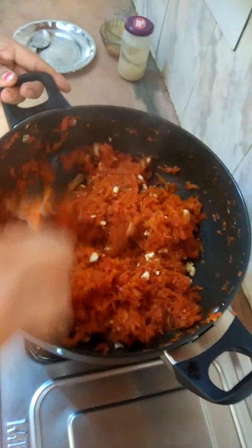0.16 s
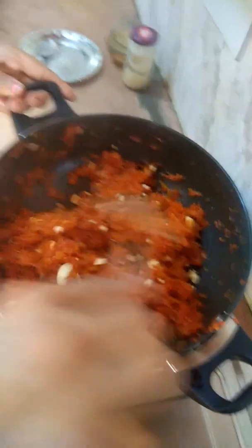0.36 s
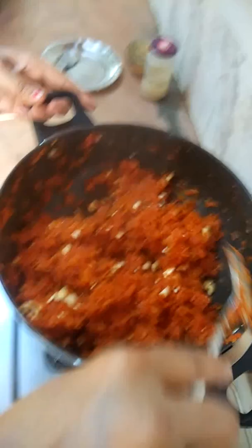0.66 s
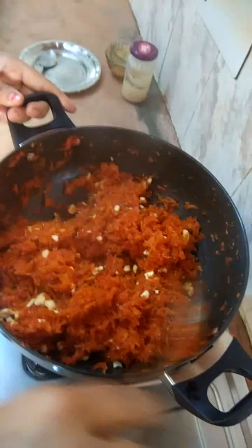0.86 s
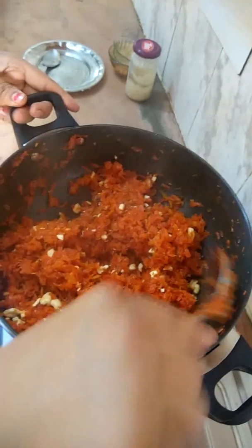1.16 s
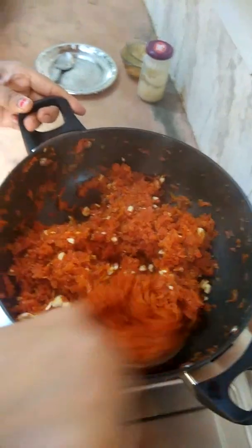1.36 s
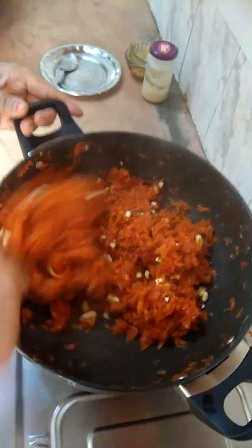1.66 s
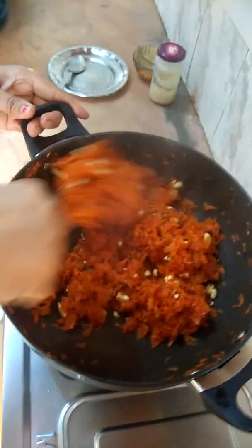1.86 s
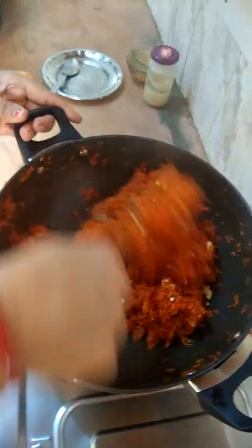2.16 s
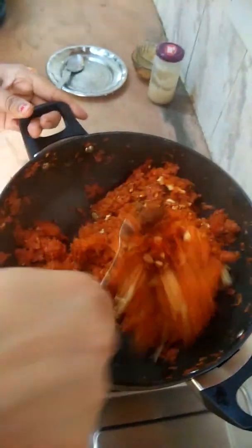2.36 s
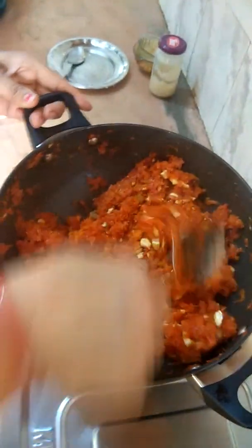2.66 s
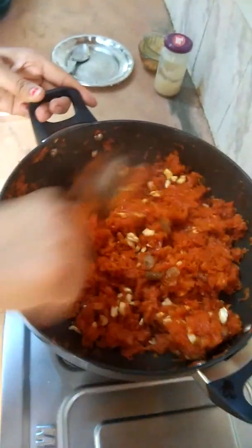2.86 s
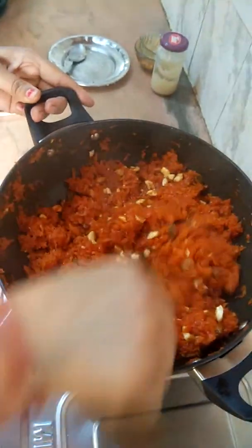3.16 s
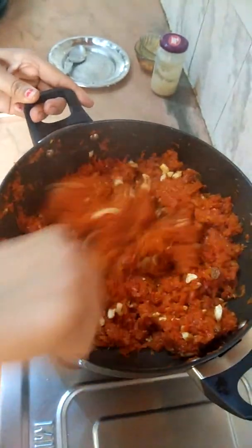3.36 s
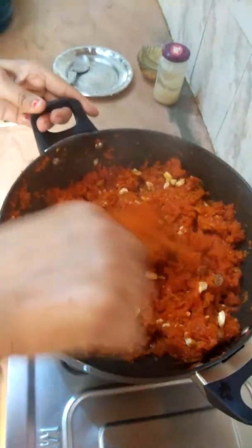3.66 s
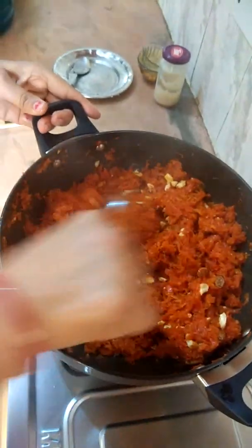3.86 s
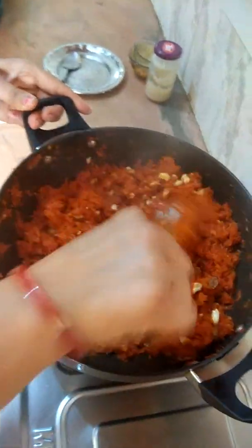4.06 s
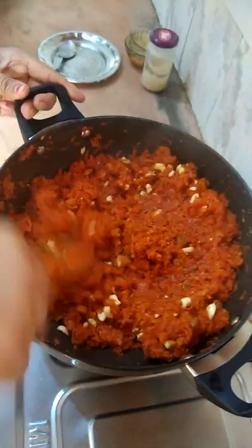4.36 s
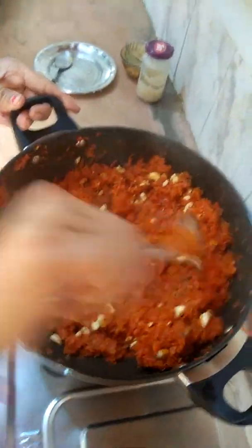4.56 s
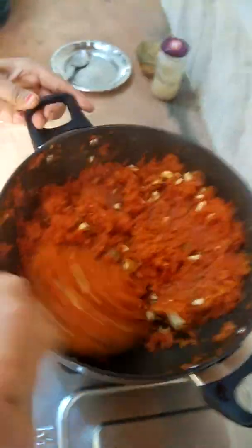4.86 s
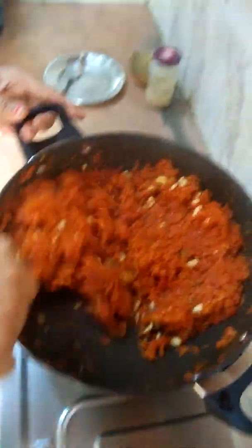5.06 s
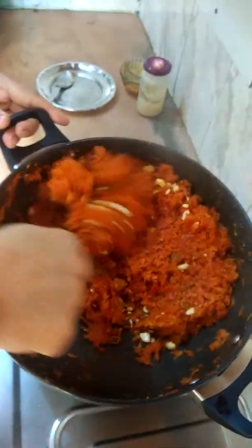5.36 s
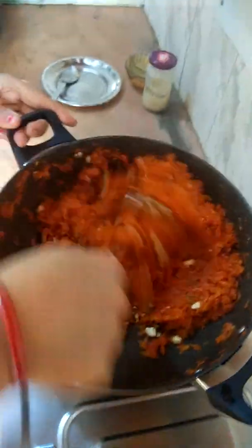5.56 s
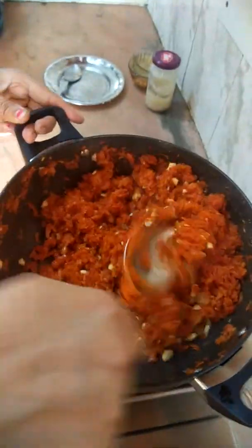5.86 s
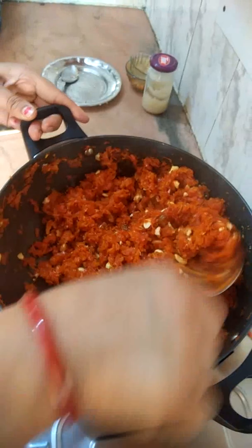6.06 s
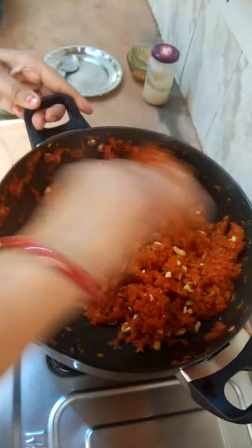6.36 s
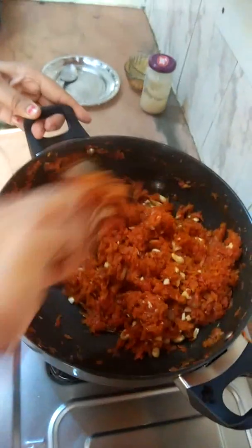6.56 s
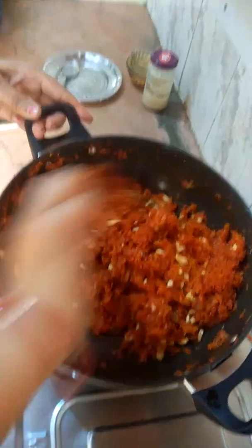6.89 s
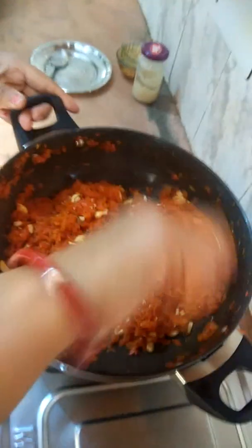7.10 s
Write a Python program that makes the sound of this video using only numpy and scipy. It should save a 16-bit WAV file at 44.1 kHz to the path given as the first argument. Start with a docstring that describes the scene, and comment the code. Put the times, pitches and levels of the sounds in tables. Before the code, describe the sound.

Someone stirs thick food in a metal pan with a spoon. Quick gritty scrapes and skidding knocks come in uneven clusters, their ring short and damped by the food. Quiet steady hiss with tiny pops and a wavering low rumble continue underneath, with occasional faint narrow squeaks. The microphone is near the pan in a small, hard-walled home kitchen, with wide crisp treble.

```python
"""A bright scrape comes first: a steel spoon strokes the bare wall of a deep metal pan in a small hard kitchen.
Strokes are dense friction clicks, knocks are skidding bursts of clicks; both sound through the pan's ring,
which the thick food damps to a short dense noise tail with a few clear modes.
Under them lie a faint sizzle of hiss and pops, and a rumble of noise booming in the lowest room resonances.
Now and then a soft narrow squeak glides by, as of the pan shifting on its stand."""
import sys
import numpy as np
from scipy import signal
from scipy.fft import rfft, irfft
from scipy.io import wavfile

SR = 44100
rng = np.random.default_rng(int(sys.argv[2]) if len(sys.argv) > 2 else 0)


def transcribe(signal):
    """Save signal, clipped to [-1, 1], as a 16-bit WAV file at the path in sys.argv[1]."""
    frames = np.atleast_2d(signal).T
    limited = np.clip(frames, -1, 1)
    pcm = np.round(limited * 32767).astype(np.int16)
    wavfile.write(sys.argv[1], SR, pcm)


N = 318843

# spoon strokes; each pair of levels slides evenly from first to last touch:
# (start t/s, length t/s, rim hiss level/dB first, last, then re that hiss: lip level/dB first, last,
#  shoulder level/dB first, last, wall level/dB first, last, belly level/dB first, last)
SPOON_STROKES = [(-.03, 0.067, -4, -33.5, -1, -8, -28, -30, -29, -28, -20, -39),
                 (0.03, 0.14, -15, -22.5, -6.5, -1.5, -33, -27, -40, -20, -50.5, -10),
                 (0.869, 0.049, -47, -31, -21, -15, -16, -23, -4, -8.5, 7, -14.5),
                 (1.336, 0.03, -4.5, -24.5, -4.5, -4, -21, -10, -13.5, -19.5, -6.5, -18),
                 (1.403, 0.087, -18.5, -21.5, -9.5, -6.5, -35, -27, -41, -17.5, -35, -31),
                 (1.484, 0.072, -21.5, -21.5, -0.5, -4.5, -13, -10, -8, -6, -19, -18),
                 (1.593, 0.059, -27.5, -20, -8, -5, -12, -22, -11, -17, -38, -32),
                 (1.638, 0.028, -4, -17, -2.5, -7, -35, -23, -17.5, -6.5, -26.5, -11),
                 (1.727, 0.12, -35.5, -38.5, -19, -0.5, -33, -28, -40, 3, -36, -26),
                 (1.915, 0.13, -51, -41.5, -5, 0.5, -6, -13, -4, -7, -9, -12),
                 (3.337, 0.21, -60, -51.5, -7, -3, -10, -6, -2, 0.5, 8, -16),
                 (3.958, 0.24, -66, -65, -3, 0, 0, 0, 9.5, 13.5, 3, -3),
                 (4.804, 0.15, -16.5, -21.5, -18, -4.5, -24.5, -9, -33.5, -14.5, -21.5, -26.5),
                 (4.957, 0.11, -21.5, -27.5, -4, -2.5, -13, -16.5, -26, -14, -43, -32),
                 (5.142, 0.32, -42.5, -57.5, -8, -2, -9, -13, -22, 4.5, -12, -13),
                 (6.389, 0.16, -23.5, -26, -10, -7.5, -25, -19.5, -17.5, -20, -36.5, -20),
                 (6.891, 0.057, -35, -39, -21, -15, -11, -22, -14, -8, -20, -11),
                 (6.936, 0.11, -28.5, -23.5, -23, -20, -30, -28, -40, -24, -33, -34.5),
                 (7.032, 0.18, -22.5, -19.5, -11, -7.5, -45, -22, -38, -18, -43, -28.5)]
STROKE_ATTACK_S, STROKE_RELEASE_S = 0.017, 0.013   # the edge settles on the metal and lifts off
WANDER_PER_S = 22   # how fast a stroke moves between places
GRIT_DB = -7   # sharp lone clicks in a stroke, re its ring

# spoon knocks: (t/s, belly level/dB before the common knock trim, then re belly: wall level/dB,
#  shoulder level/dB, rim level/dB; loudest mode f/Hz, skid t/s, crack level/dB re usual)
SPOON_KNOCKS = [(0.351, -44, -2.5, -8, -22, 925, 0.01, 0), (0.841, -35, -5, -19, -3, 780, 0.023, 19),
                (1.285, -26.5, -8.5, -18, 5, 655, 0.0099, 15.5),
                (1.682, -43.5, 4, 12.5, 3, 1480, 0.0032, 9), (1.846, -26, 0.5, -4, -1, 475, .009, 11),
                (2.87, -20.5, 3.5, 2, 7.5, 1120, 0.0062, 12.5),
                (3.055, -38.5, -2, -20, -44.5, 536, 0.023, -1), (4.12, -42, -5.5, -25, -26, 557, 0.014, -5),
                (4.284, -29.5, -4, -11, -16, 1410, 0.013, -7),
                (4.308, -38.5, -5, -18, -25, 585, 0.0042, -9), (5.63, -15, -2.5, -6, -8, 1890, 0.014, 12.5),
                (6.459, -49.5, -11, 7, 23, 583, 0.004, 8), (6.776, -35, 2.5, -6.5, 2.5, 484, 0.0092, 9),
                (6.802, -38, -8, -15, -7, 604, 0.0041, -5), (6.884, -44.5, 6.5, -1, 11, 2310, 0.01, 6)]
KNOCK_TRIM_DB = -7.5   # on the clicks of every knock
KNOCK_LIP_DB = -3   # lip zone of a knock, re its rim zone
SKID_CLICKS = 16
NEAR_MODE_DB, NEAR_MODE_REACH_OCT = 12, 0.14   # a knock favours the modes near its pitch

# zones of the pan, in order belly, wall, shoulder, lip, rim: (lowest f/Hz, highest f/Hz)
PAN_ZONES = [(250, 1400), (1400, 3500), (3500, 5100), (5100, 7800), (7800, 17500)]
# spectrum of the dense ring, relative within a zone: (f/Hz, level/dB per Hz)
PAN_COLOUR_CURVE = [(220, -17.5), (1420, -16.5), (1900, -11.5), (2600, -13.5), (3300, -12.5), (3740, -21.5),
                    (4400, -11), (5000, -18.5), (5300, 1.5), (7500, 0), (9180, 2), (12700, 0.5),
                    (14500, -4), (16000, -9)]
# how unlike the places on the wall sound, in narrow bands: (f/Hz, spread level/dB)
PLACE_SPREAD = [(1000, 6), (6000, 6.5)]
# modes that stand out of the dense ring: (f/Hz, level/dB, t60 t/s)
CLEAR_MODES = [(445, -6.5, 0.054), (588, -15.5, 0.25), (709.6, -4, 0.081), (1098, -4.5, 0.067),
               (1494, -6.5, 0.073), (2020, -6, 0.052), (2207, -0.5, 0.034), (2865, -2, 0.038),
               (4150, -2, .05), (6630, -2, 0.099), (8740, -6.5, 0.074)]
# fall of the dense ring and room by 60 dB: one t/s for each zone
ZONE_T60 = [0.22, 0.2, 0.17, 0.23, 0.26]
# direct sound of the contact: one level/dB for each zone
CRACK_LEVELS = [-5, 0, -3, -2, 3]
CRACK_T60_S = 0.0085
RING_RISE_S = 0.0033   # the dense ring takes a moment to build up
PLACES = 7   # on the wall, each with a colour of its own

# hiss of the sizzle before its pops: (t/s, level/dB)
SIZZLE_LEVEL = [(0, -49), (2.2, -46.5), (7.23, -48)]
# relative spectrum of that hiss: (f/Hz, level/dB per Hz)
SIZZLE_SPECTRUM = [(15, -54), (25, -12.5), (59, -18.5), (102, -5.5), (185, -5), (217, -50), (394, -35),
                   (503, -24.5), (714, -18.5), (2220, -15.5), (7110, -18.5), (9840, -16), (16000, -17.5)]

# slow rumble under the booms: (t/s, level/dB at the lowest room resonance, second, third)
SLOW_RUMBLE = [(0, -72, -55.5, -66), (.66, -48.5, -64.5, -74), (1.1, -49, -70, -55.5), (1.5, -36, -36, -49),
               (1.75, -53.5, -46, -46), (2.05, -37.5, -37.5, -43.5), (2.44, -74, -39.5, -60.5),
               (2.7, -52, -59, -70), (3.4, -56, -61.5, -69.5), (3.9, -67, -104, -71.5),
               (4.2, -78, -52, -52.5), (4.5, -55, -59.5, -69.5), (5.3, -52, -52, -69),
               (6.15, -48.5, -57, -60), (7.23, -66, -73, -90)]
# short soft booms, at their peak: (middle t/s, length t/s, level/dB at the lowest resonance, second)
RUMBLE_BOOMS = [(0.918, 0.1, -38.5, -49), (1.032, 0.11, -37, -54), (1.118, 0.064, -27, -69),
                (1.173, 0.049, -22.5, -68), (1.268, 0.27, -36, -55), (1.364, 0.054, -23.5, -57),
                (1.422, 0.059, -27.5, -40), (1.586, 0.085, -33, -43), (1.912, 0.13, -44.5, -30.5),
                (2.14, 0.11, -66, -35), (2.294, 0.18, -47, -33), (2.56, 0.21, -27, -74),
                (5.465, 0.14, -40.5, -81), (5.694, 0.16, -49, -35.5)]
BOOM_THIRD_DB = -18.5   # a boom at the third resonance, re the second
# lowest resonances of the room, before a second and broader pass: (f/Hz, width f/Hz)
ROOM_RESONANCES = [(99, 12.6), (176, 13.6), (315, 47)]
WHIRR_HZ, WHIRR_WIDTH_HZ, WHIRR_DB = 711, 103, -66.5   # a faint steady narrow hum; width of each pass

# soft narrow squeaks, before roughening: (start t/s, end t/s, start f/Hz, end f/Hz, level/dB)
PAN_SQUEAKS = [(3.48, 3.578, 1003, 1240, -56), (3.85, 4.138, 726, 790, -56), (4.04, 4.24, 333, 300, -50),
               (6.3, 6.392, 870, 863, -53.5), (6.66, 6.8, 354, 370, -53.5)]

# how alike the left and right ports are: (f/Hz, likeness from 0 to 1)
PORT_LIKENESS = [(90, 0.92), (200, 0.99), (400, 0.45), (1400, 0.079)]
TREBLE_HZ, TREBLE_LEFT_DB, LEFT_DB = 11640, 9.5, -0.5   # left re right: treble, and level throughout
CUTOFF_HZ = 15750


def from_db(db):
    """Gain of a level."""
    return 10 ** (np.asarray(db) / 20)


def rms_one(x):
    """Scaled to rms 1."""
    return x / np.sqrt(np.mean(x ** 2) + 1e-20)


def in_time(rows):
    """Columns of a curve at every sample."""
    s, *columns = np.transpose(rows)
    return np.array([np.interp(np.arange(N) / SR, s, c) for c in columns])


def at_hz(points, hz):
    """A spectrum read on a log-frequency axis."""
    point_hz, values = np.transpose(points)
    return np.interp(np.log(hz + 1), np.log(point_hz), values)


def drift(per_s, count):
    """Random curves, straight between normal draws of spread 1 taken per_s times a second."""
    knots = rng.standard_normal((count, int(N / SR * per_s) + 2))
    position = np.arange(N) / SR * per_s
    return np.array([np.interp(position, np.arange(len(k)), k) for k in knots])


def stereo_noise(colour, size):
    """Coloured noise, alike in both ports in the bass and mostly unrelated in the treble; rms 1."""
    hz = np.fft.rfftfreq(size, 1 / SR)
    mid, side = rfft(rng.standard_normal((2, size))) * from_db(at_hz(colour, hz))
    alike = at_hz(PORT_LIKENESS, hz)
    ports = np.sqrt(1 + alike) * mid + np.sqrt(1 - alike) * side * [[1], [-1]]
    return rms_one(irfft(ports, size))


def grains(per_s, spread_db, shape):
    """Random clicks with a tail of sizes, towards loud or (negative spread) soft; rms 1."""
    sizes = from_db(spread_db * np.minimum(rng.exponential(1, shape), 5))
    signed = sizes * rng.choice([-1, 1], shape)
    return rms_one(signed * (rng.random(shape) < per_s / SR))


def through(force, answer):
    """A steady force sounds through an answer at its own level."""
    energy = np.mean(np.sum(answer ** 2, axis=1))
    return signal.oaconvolve(force[None], answer / np.sqrt(energy), axes=1)[:, :N]


def pan_ring(zone):
    """Click answer of one zone at one place, both ports: dying dense ring with clear modes, and crack."""
    size = SR // 2
    t = np.arange(size) / SR
    low_hz, high_hz = PAN_ZONES[zone]
    band = signal.butter(8, (low_hz, high_hz), "band", fs=SR, output="sos")
    # random bumps and dips give the place its own colour
    hz = np.linspace(130, 17000, num=421)
    knots_hz = hz[::6]
    patches = np.interp(hz, knots_hz, rng.standard_normal(len(knots_hz)))
    colour_db = at_hz(PAN_COLOUR_CURVE, hz) + patches * at_hz(PLACE_SPREAD, hz)
    dense = rms_one(signal.sosfilt(band, stereo_noise(np.transpose([hz, colour_db]), size)))
    ring = dense * from_db(-60 * t / ZONE_T60[zone]) * (1 - np.exp(-t / RING_RISE_S))
    for mode_hz, level_db, t60 in CLEAR_MODES:
        if low_hz < mode_hz < high_hz:
            phase = (1 - at_hz(PORT_LIKENESS, mode_hz)) * rng.uniform(-np.pi, np.pi, (2, 1))
            ring += from_db(level_db - 60 * t / t60) * np.sin(2 * np.pi * mode_hz * t + phase)
    crack = dense * from_db(CRACK_LEVELS[zone] - 60 * t / CRACK_T60_S)
    return ring, crack


def stroke_level():
    """How hard the spoon edge drives each zone, under an uneven hand."""
    level, t = np.zeros((len(PAN_ZONES), N)), np.arange(N) / SR
    for start_s, length_s, *ends_db in SPOON_STROKES:
        along = np.clip((t - start_s) / length_s, 0, 1)
        hiss_db, *zones_db = [a + (b - a) * along for a, b in np.reshape(ends_db, (-1, 2))]
        settle = (t - start_s) / STROKE_ATTACK_S
        lift = (start_s + length_s - t) / STROKE_RELEASE_S + 1
        touching = np.clip(np.minimum(settle, lift), 0, 1)
        belly_to_rim_db = np.array(zones_db[::-1] + [0 * hiss_db])
        level += touching * from_db(hiss_db + belly_to_rim_db)
    return level * from_db(1.8 * drift(per_s=38, count=len(PAN_ZONES)))


def strokes(rings):
    """Fine friction clicks wander over the places and ring; lone grit clicks only crack."""
    out, level = np.zeros((2, N)), stroke_level()
    share = from_db(38.0 * drift(WANDER_PER_S, count=PLACES))
    share /= np.sqrt(np.sum(share ** 2, axis=0))   # total power stays the same
    friction = share * grains(per_s=9000, spread_db=2.5, shape=(PLACES, N))
    grit = from_db(GRIT_DB) * grains(per_s=1300, spread_db=2.5, shape=N)
    for place, force in zip(rings, friction):
        for (ring, crack), zone_level in zip(place, level):
            out += through(force * zone_level, ring)
    for (ring, crack), zone_level in zip(rings[0], level):
        out += through(grit * zone_level, crack)
    return out


def knocks(rings):
    """A knock is a first click and a short skid of ever weaker clicks over neighbouring places."""
    out = np.zeros((2, N + SR))
    for k, (s, belly_db, wall_db, shoulder_db, rim_db, _, skid_s, crack_db) in enumerate(SPOON_KNOCKS):
        re_belly_db = np.array([0, wall_db, shoulder_db, rim_db + KNOCK_LIP_DB, rim_db])
        zones = from_db(belly_db + KNOCK_TRIM_DB + re_belly_db)
        answers = [sum(gain * (ring + from_db(crack_db) * crack)
                       for gain, (ring, crack) in zip(zones, place)) for place in rings]
        lateness = np.sort(rng.random(SKID_CLICKS))   # as a share of the skid
        lateness[0] = 0
        signs = rng.choice([-1, 1], SKID_CLICKS)
        for i, late in enumerate(lateness):
            click_gain = signs[i] * from_db(-2.5 * (i > 0) - 8.4 * late)
            start = round((s + skid_s * late) * SR)
            out[:, start:start + SR // 2] += click_gain * answers[(k + i) % PLACES]
    return out[:, :N]


def knock_tones():
    """Each knock rings extra in the modes nearest to its pitch, as dying sines alike in both ports."""
    out, t = np.zeros(N + SR), np.arange(SR // 2) / SR
    for s, belly_db, wall_db, _, _, pitch_hz, _, _ in SPOON_KNOCKS:
        start = round(s * SR)
        for hz, level_db, t60 in CLEAR_MODES:
            near = np.exp(-(np.log2(hz / pitch_hz) / NEAR_MODE_REACH_OCT) ** 2)
            above_belly = hz > PAN_ZONES[0][1]
            size_db = belly_db + wall_db * above_belly + level_db + NEAR_MODE_DB
            tone = from_db(size_db - 60 * t / t60) * np.sin(2 * np.pi * hz * t)
            out[start:start + len(t)] += near * tone
    return out[:N]


def pan():
    """Strokes and knocks excite the same pan, so they share its rings."""
    rings = [[pan_ring(zone) for zone in range(len(PAN_ZONES))] for place in range(PLACES)]
    return strokes(rings) + knocks(rings) + knock_tones()


def sizzle():
    """Smooth kitchen hiss, roughened by tiny pops of the frying food."""
    clicks = np.abs(grains(per_s=460, spread_db=-2.0, shape=N))
    pops = signal.lfilter([.02], [1, -.98], clicks)   # each pop dies away softly
    hiss = from_db(in_time(SIZZLE_LEVEL)) * stereo_noise(SIZZLE_SPECTRUM, N)
    return hiss * (1 + 0.13 * rms_one(pops))


def resonance(x, hz, width_hz):
    """Two-pole resonance, silent at zero and at half the sample rate."""
    r = np.exp(-np.pi * width_hz / SR)
    return signal.lfilter([1, 0, -1], [1, -2 * r * np.cos(2 * np.pi * hz / SR), r * r], x)


def rumble_gains():
    """Gain at each room resonance: the slow rumble with a smooth swell for every boom."""
    gains, t = from_db(in_time(SLOW_RUMBLE)), np.arange(N) / SR
    for s, length_s, low_db, second_db in RUMBLE_BOOMS:
        swell = np.cos(np.pi * np.clip((t - s) / length_s, -.5, .5)) ** 2
        gains += swell * from_db([[low_db], [second_db], [second_db + BOOM_THIRD_DB]])
    return gains


def rumble():
    """Low noise that only the room resonances carry, and a faint narrow whirr."""
    out = np.zeros((2, N))
    noise = stereo_noise([(20, 0), (2000, 0)], N)   # flat spectrum
    for gain, (hz, width_hz) in zip(rumble_gains(), ROOM_RESONANCES):
        boom = rms_one(resonance(resonance(noise, hz, width_hz), hz, 3 * width_hz))
        envelope = np.abs(signal.hilbert(boom[0] + boom[1])) / 2
        steadied = boom / (0.94 + envelope) ** 0.25   # eases the wavering of the level
        out += gain * rms_one(steadied)
    whirr = resonance(resonance(noise, WHIRR_HZ, WHIRR_WIDTH_HZ), WHIRR_HZ, WHIRR_WIDTH_HZ)
    return out + from_db(WHIRR_DB) * rms_one(whirr)


def squeaks():
    """Gliding tones roughened to a narrow band of noise, unlike at the two ports."""
    out = np.zeros((2, N))
    slow = signal.butter(2, 70, fs=SR, output="sos")
    rough = rms_one(signal.sosfilt(slow, rng.standard_normal((2, N))))
    for start_s, end_s, start_hz, end_hz, level_db in PAN_SQUEAKS:
        span = slice(round(start_s * SR), round(end_s * SR))
        glide_hz = np.linspace(start_hz, end_hz, span.stop - span.start)
        swell = np.sqrt(np.hanning(len(glide_hz)))
        tone = np.sin(2 * np.pi * np.cumsum(glide_hz) / SR)
        out[:, span] += from_db(level_db) * swell * (0.94 + rough[:, span]) * tone
    return out


def scene():
    """All sources at the two ports."""
    return pan() + sizzle() + rumble() + squeaks()


def record(dry):
    """The left port lifts the treble, the right one lowers it; peaks are rounded, the top is cut."""
    high = signal.butter(2, TREBLE_HZ, "high", fs=SR, output="sos")
    treble = signal.sosfiltfilt(high, dry)
    opposite = np.array([[.5], [-.5]])   # half the difference to each port
    coloured = dry + treble * (from_db(TREBLE_LEFT_DB * opposite) - 1)
    coloured = coloured * from_db(LEFT_DB * opposite)
    top_cut = signal.cheby1(12, 1, CUTOFF_HZ, fs=SR, output="sos")
    return signal.sosfilt(top_cut, np.tanh(coloured))


dry = scene()
out = record(dry)
transcribe(out)
```